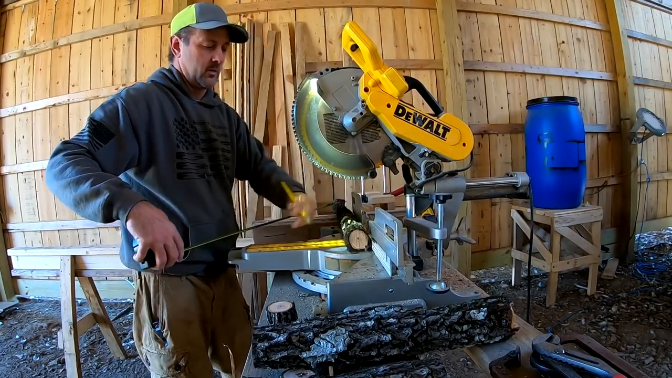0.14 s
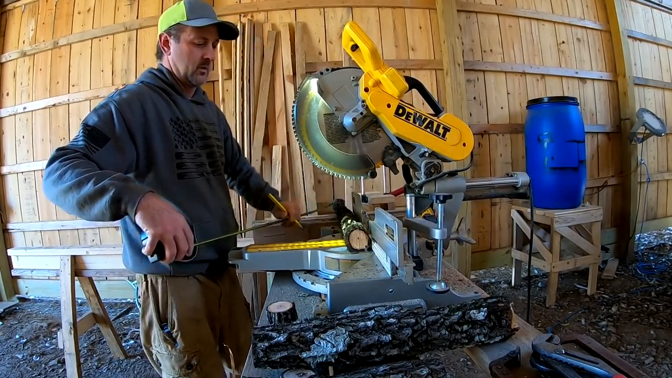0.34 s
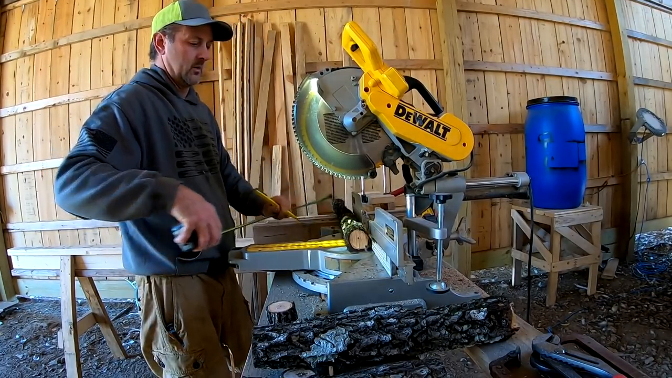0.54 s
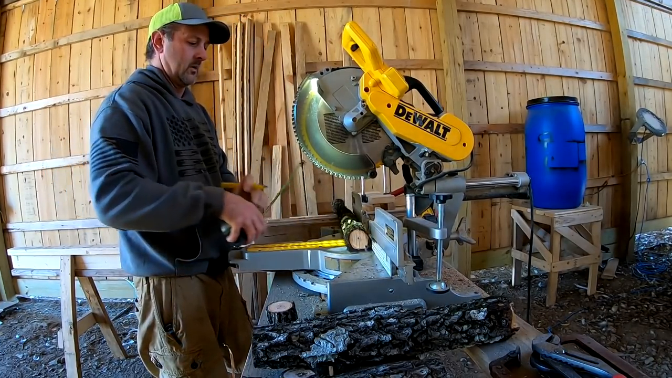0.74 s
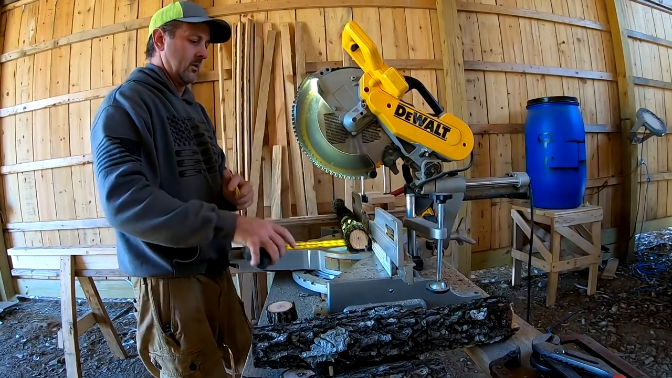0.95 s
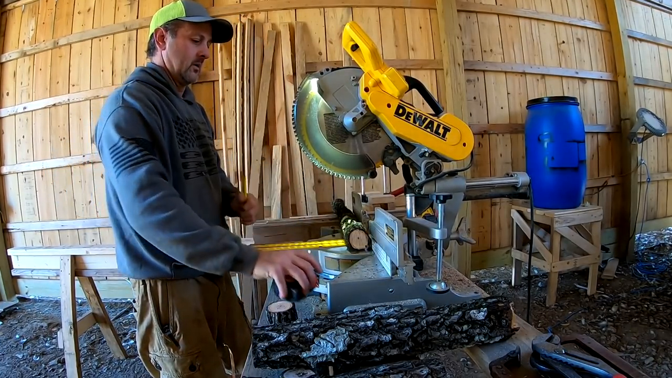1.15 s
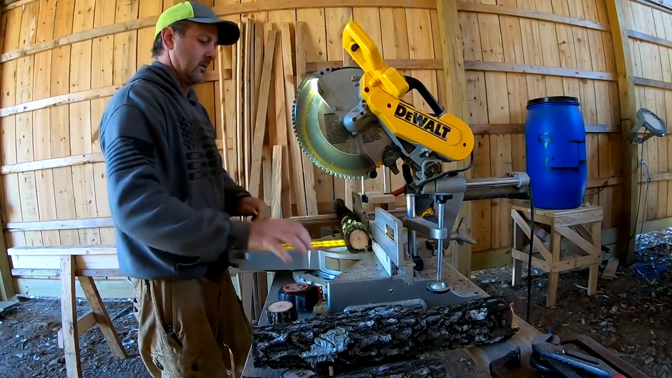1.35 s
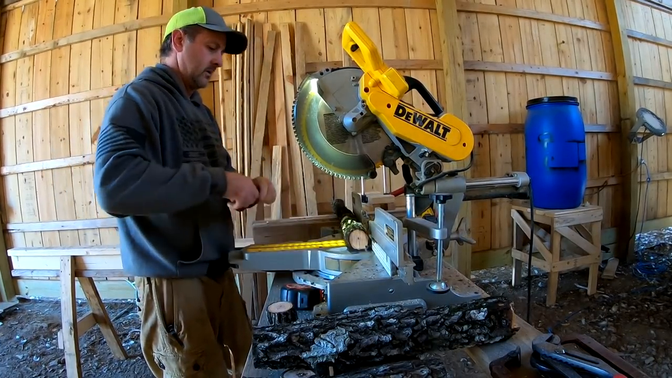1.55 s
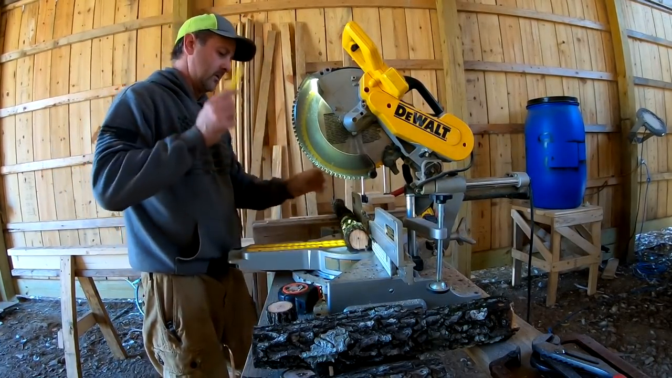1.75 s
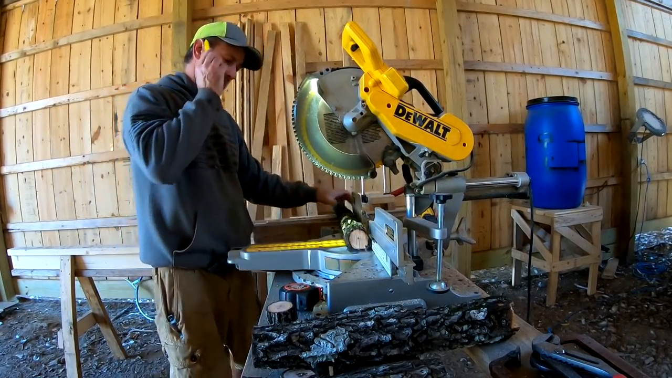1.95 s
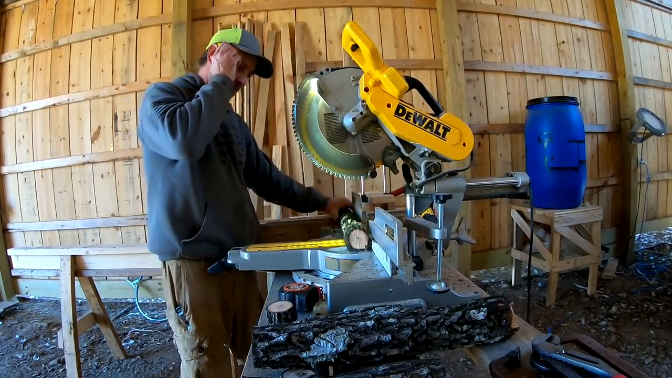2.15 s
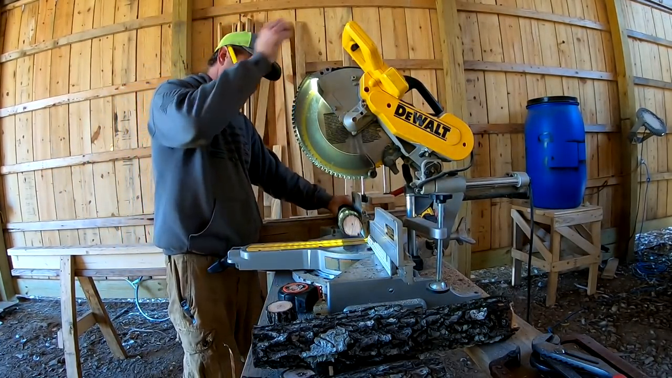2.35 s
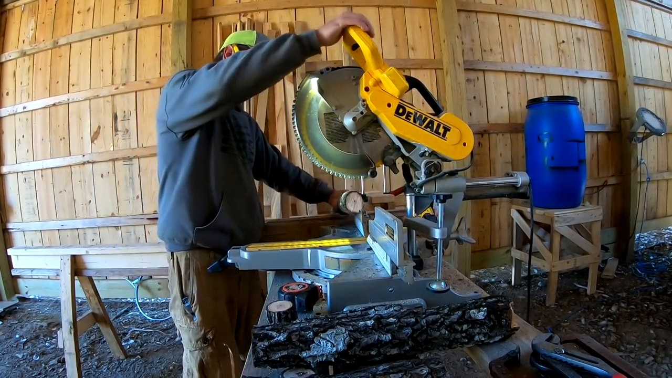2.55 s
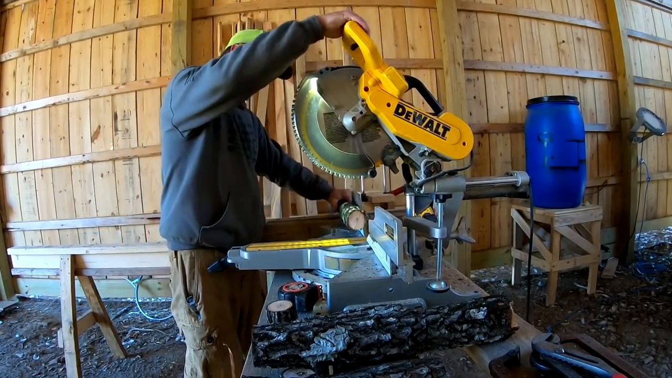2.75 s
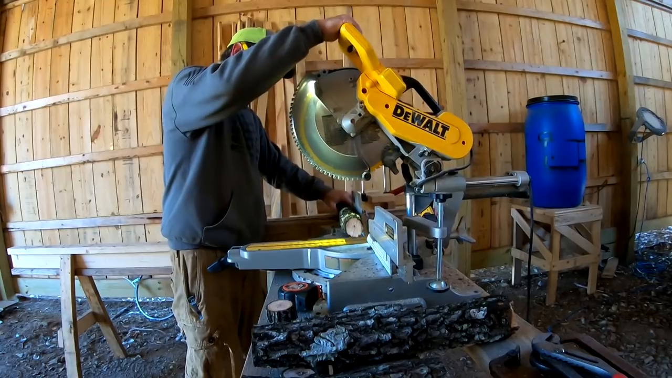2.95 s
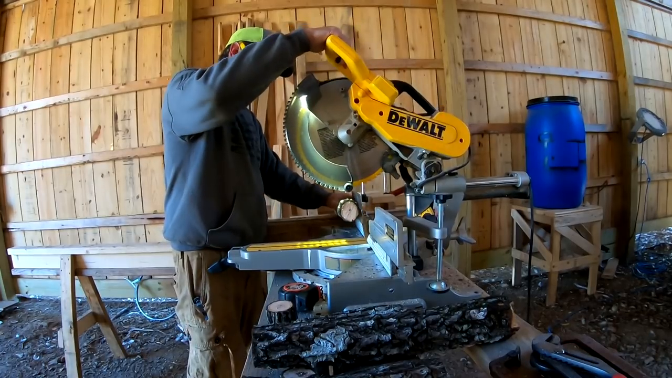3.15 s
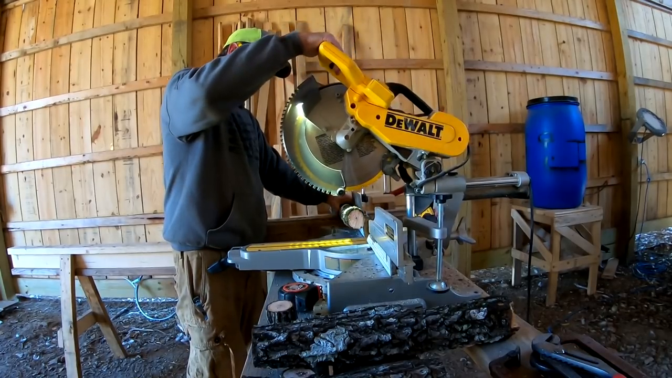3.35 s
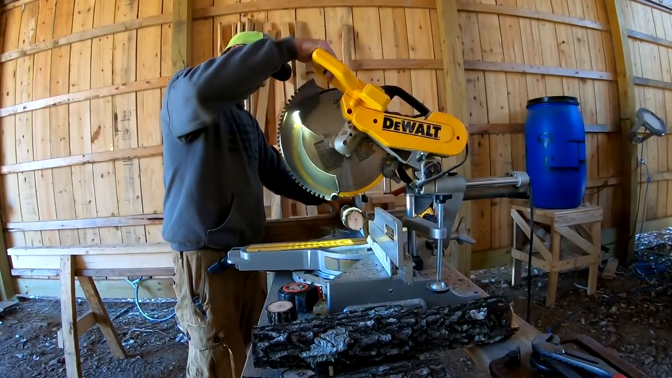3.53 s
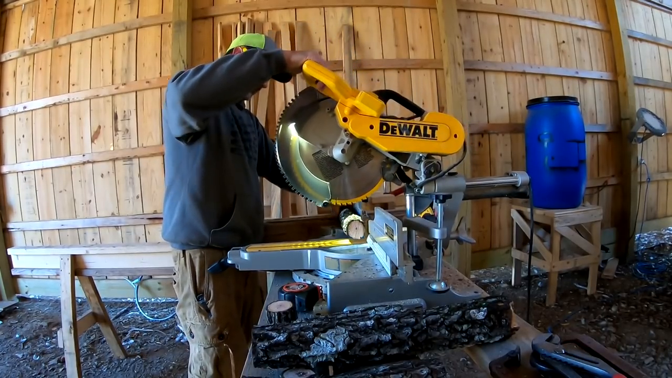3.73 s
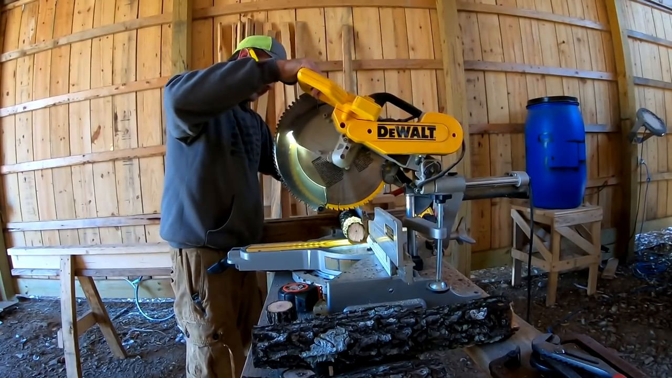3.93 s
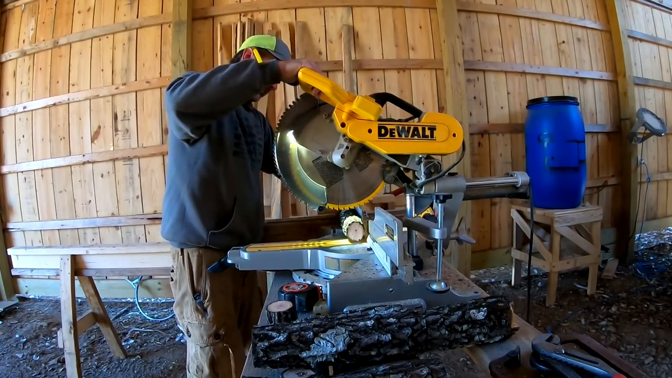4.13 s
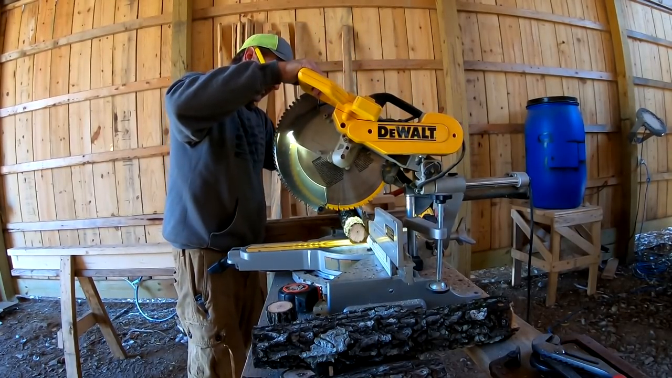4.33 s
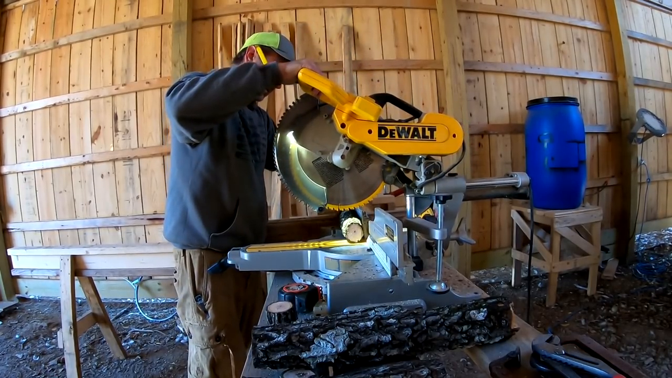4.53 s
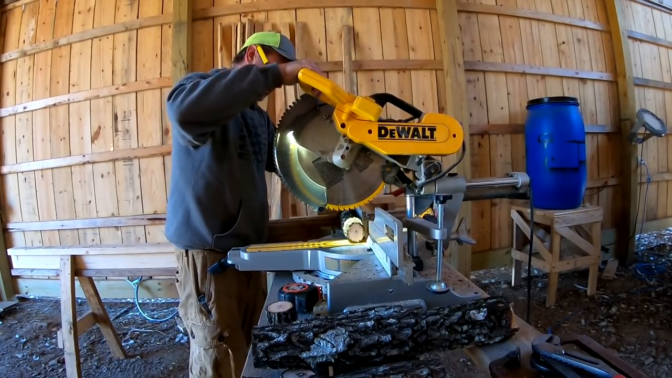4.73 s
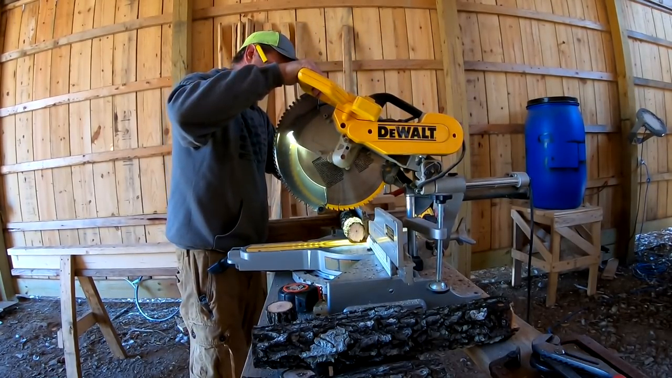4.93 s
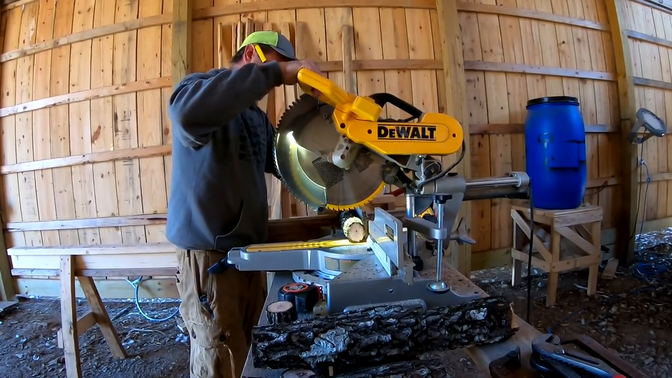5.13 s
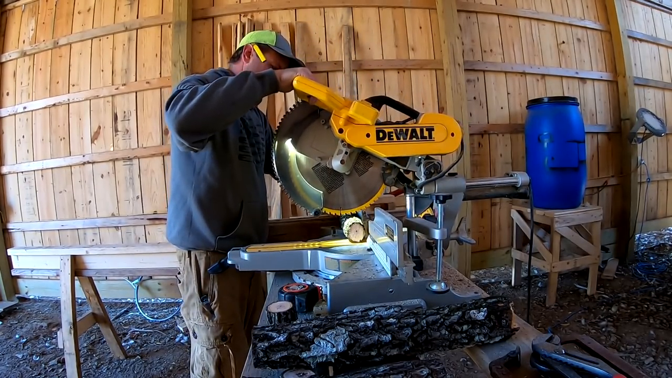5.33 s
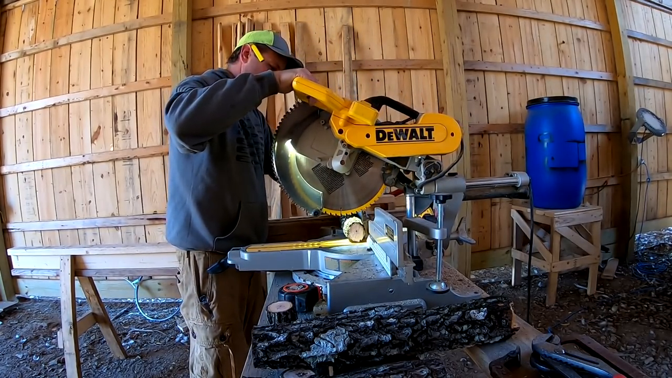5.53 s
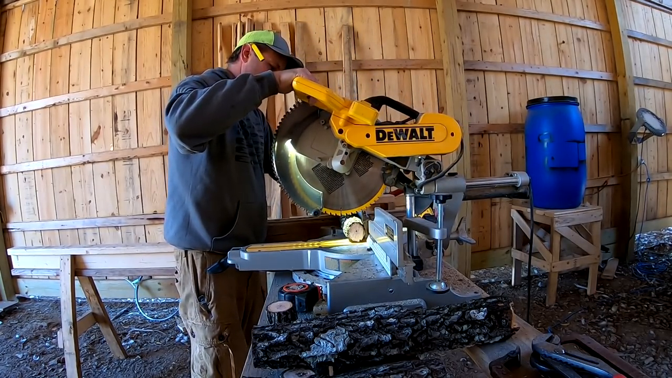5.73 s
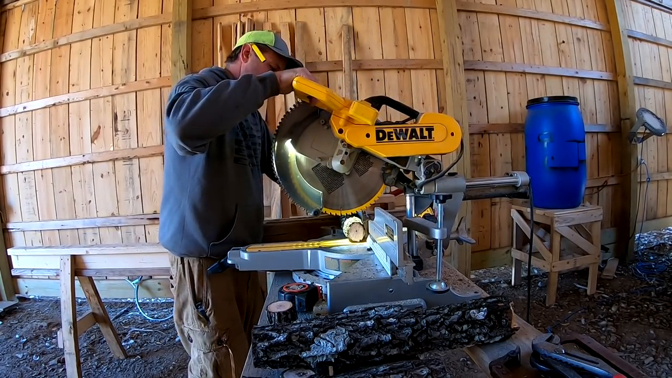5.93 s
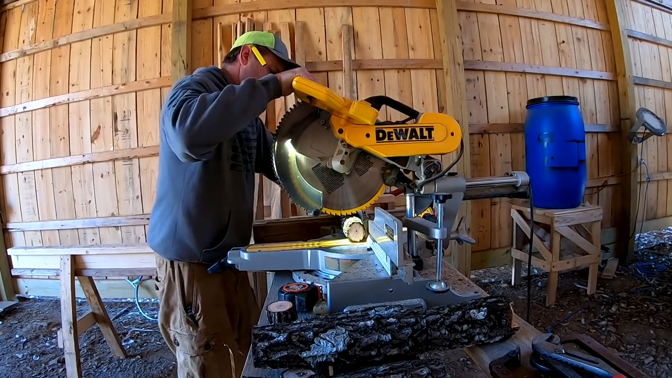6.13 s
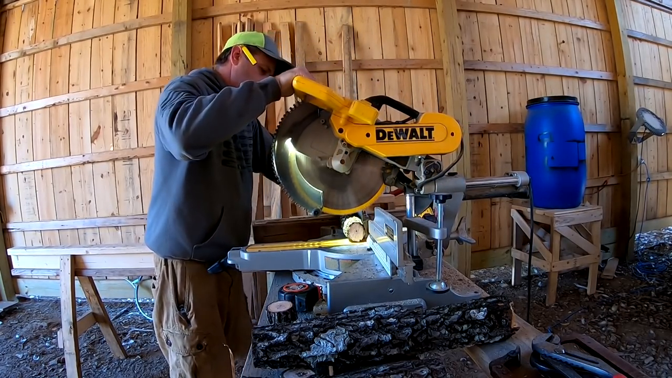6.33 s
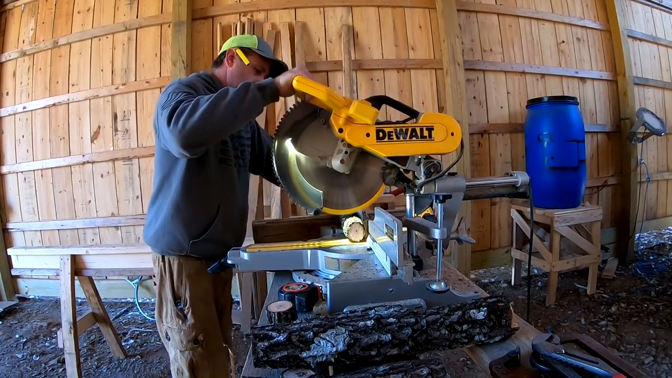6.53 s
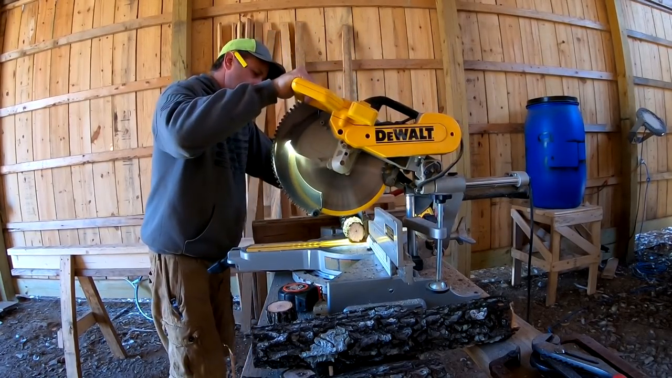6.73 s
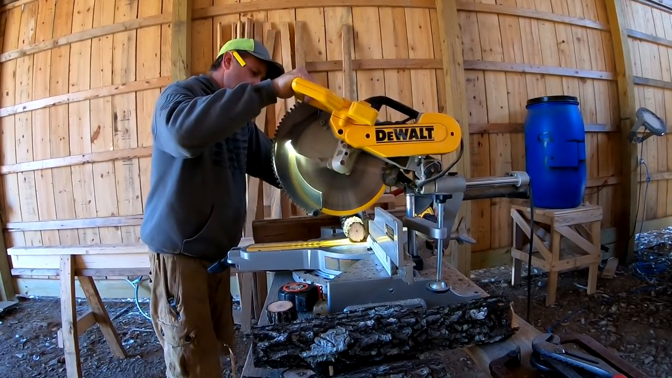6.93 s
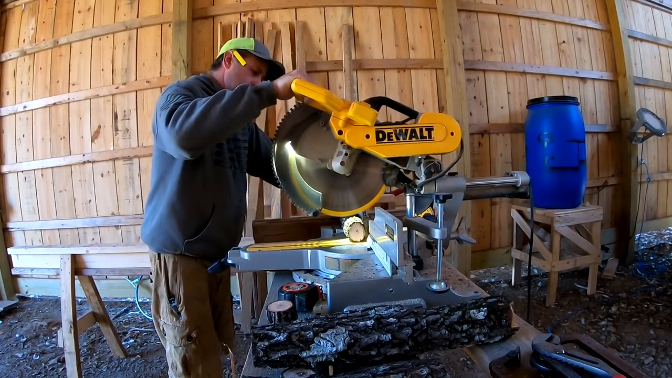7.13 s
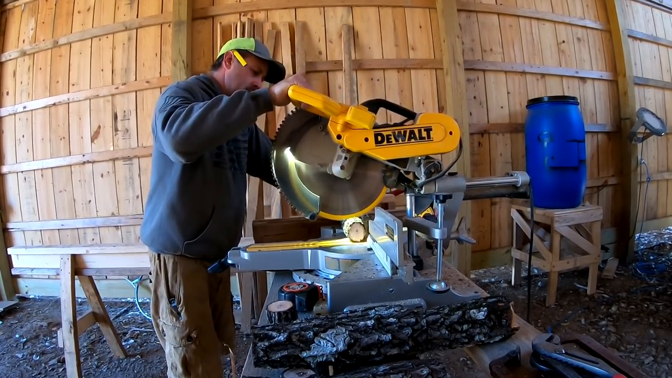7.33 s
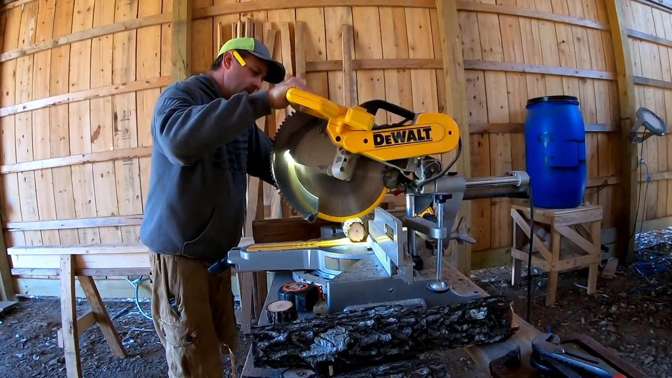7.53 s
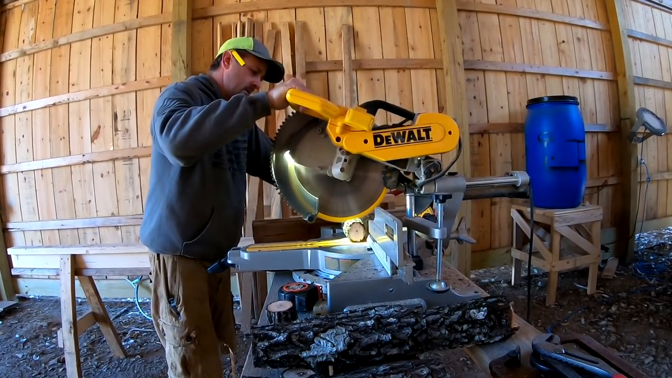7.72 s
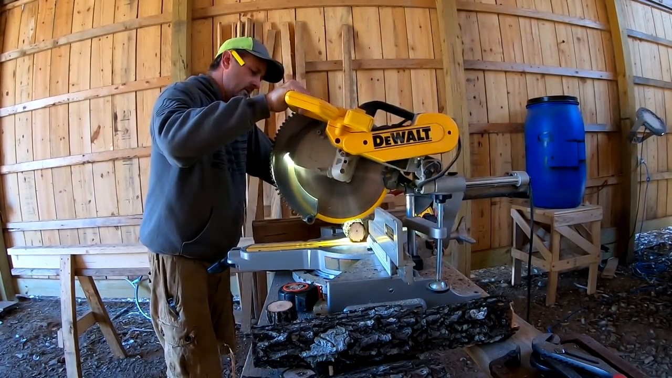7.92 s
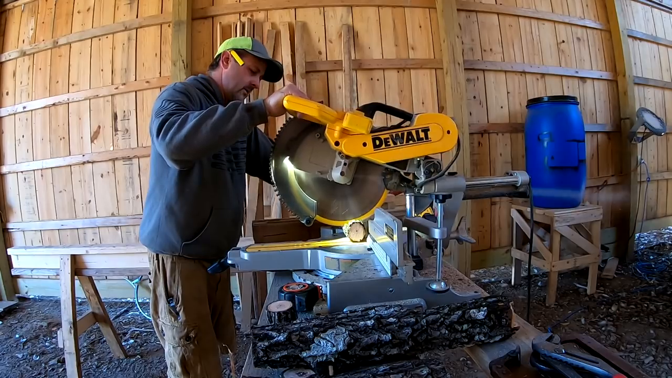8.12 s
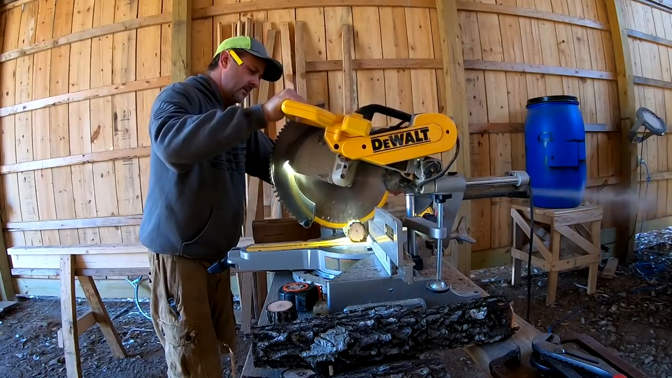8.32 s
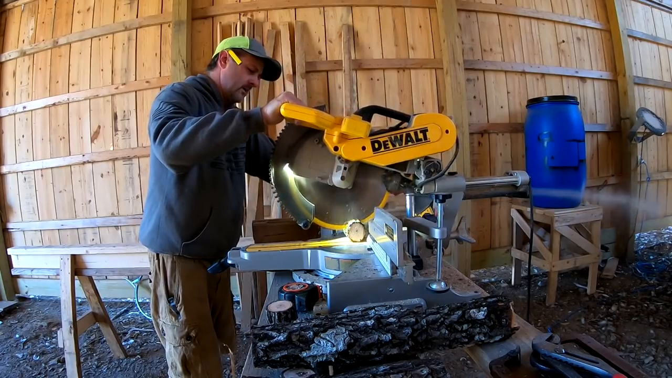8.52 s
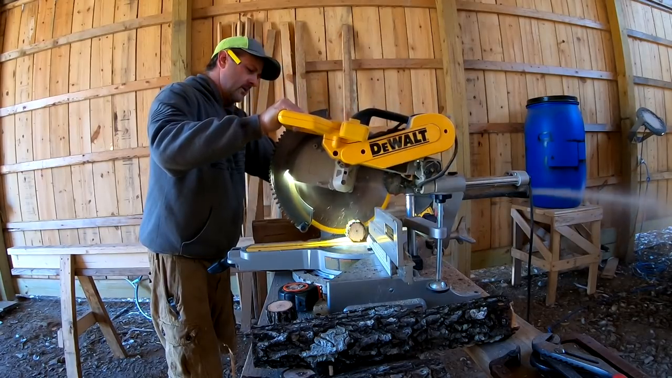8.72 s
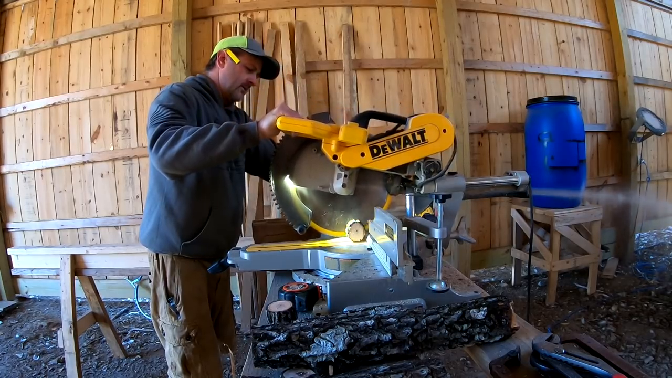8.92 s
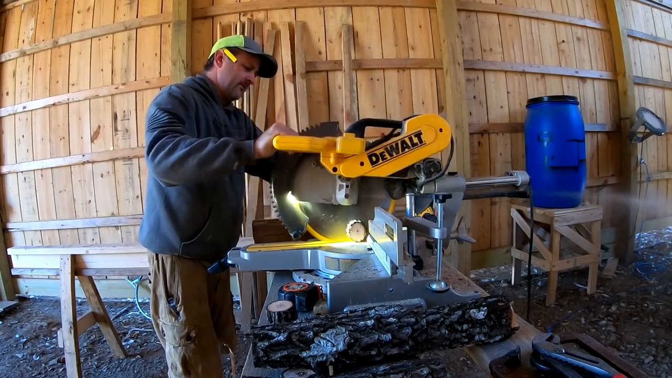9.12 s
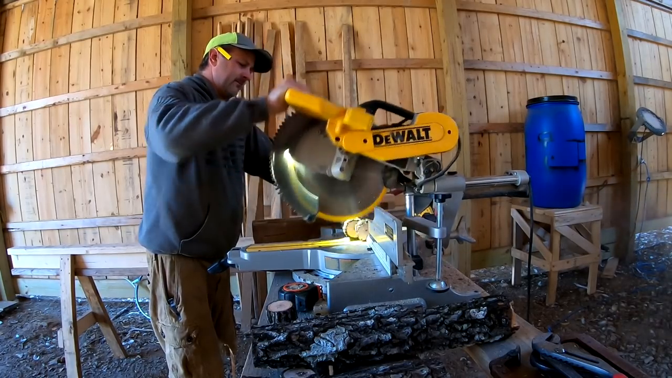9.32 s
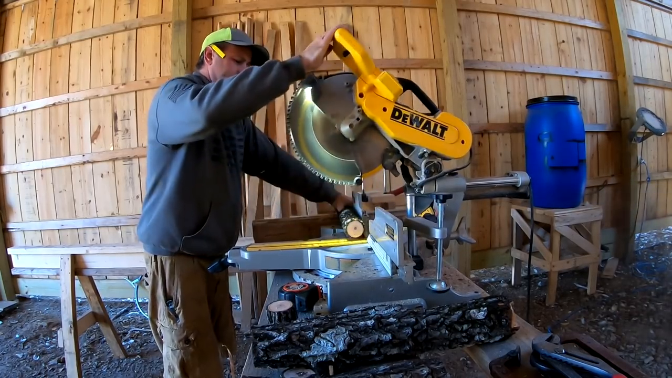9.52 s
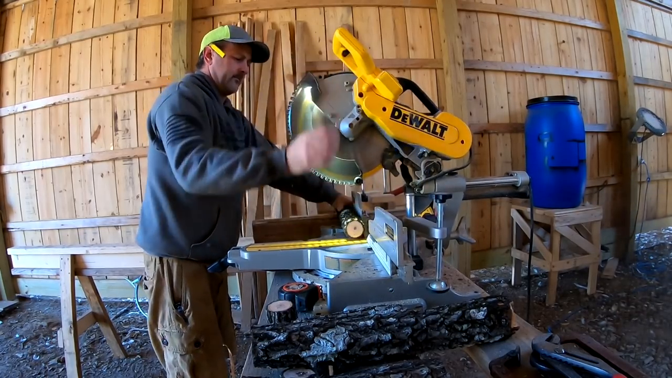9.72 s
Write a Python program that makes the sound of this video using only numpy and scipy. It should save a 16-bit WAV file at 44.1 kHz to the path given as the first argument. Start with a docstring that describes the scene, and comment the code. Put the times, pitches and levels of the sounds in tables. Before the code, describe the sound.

Metallic tape chatter and a snap, hollow wooden knocks and scrapes, then a loud power saw starts, bites through a pole and winds down.

```python
"""In a barn a steel tape measure rattles back into its case, then a wooden pole is knocked and slid into place
on a miter saw and the saw head is lowered. The motor starts with a clack and whines up to speed, the blade
bites and rings as the load drags it down, then it runs free and the brake winds it down.
Contacts and friction excite resonant bodies; the saw's whine, gears and brushes follow one speed curve,
with coloured noise for torn air and dust and tones for the modes of the disc."""
import sys
import numpy as np
from scipy import signal
from scipy.fft import rfft, irfft, next_fast_len
from scipy.io import wavfile
from scipy.ndimage import map_coordinates

SR = 44100
rng = np.random.default_rng(int(sys.argv[2]) if len(sys.argv) > 2 else 0)


def output_pcm(signal):
    """Save a mono or channel-first signal as 16-bit PCM at the path in sys.argv[1].

    Samples are clipped to [-1, 1] before scaling.
    """
    pcm = np.clip(np.atleast_2d(signal).T, -1, 1) * 32767
    wavfile.write(sys.argv[1], SR, np.round(pcm).astype(np.int16))


N = 430857

# Spectrum of the shaken bench. Each row: frequency in Hz, relative level in dB per Hz.
BENCH_RUMBLE = [(18, -41), (30, -3), (49, -2.5), (86, 1.5), (173, 3), (219, -3), (312, -4.5), (429, -20.5),
                (500, -34), (650, -43.5), (1100, -120)]
START_S, BRAKE_S = 6.368, 9.39  # trigger pulled and let go
# motor speed as the pitch of its fan whine: running free, and after the first jolt
TOP_SPEED_HZ, KICK_HZ = 2514.6, 235
RUN_UP_S, RUN_DOWN_S = .488, .465  # time constants of the speed


def amp(db):
    """Decibels to gain: 20 dB is a factor of ten in amplitude."""
    return np.exp(np.asarray(db) * float(np.log(10) / 20))


def unit(x):
    """Normalisation to a root mean square of 1."""
    return x / np.sqrt(np.mean(x ** 2) + 1e-20)


def along(points, hz):
    """Interpolation of (Hz, value) points on a logarithmic frequency axis."""
    f, v = np.transpose(points)
    return np.interp(np.log(hz + 1), np.log(f + 1), v)


def since(s):
    """Elapsed time: seconds gone by since time s, zero before it."""
    return np.maximum(np.arange(N) / SR - s, 0)


def wobble(rate):
    """Slow random modulation: a smooth curve through random knots, rate of them a second."""
    knots = rng.standard_normal(int(N * rate / SR) + 4)
    step = 16  # samples between curve points, joined by straight lines
    at = np.arange(0, N + step, step) * rate / SR
    coarse = map_coordinates(knots, [at], order=2).astype(np.float32)
    fraction = np.arange(step, dtype=np.float32) / step
    return (coarse[:-1, None] + np.diff(coarse)[:, None] * fraction).ravel()[:N]


def filtered(x, response):
    """Linear filtering: the spectrum of x times a response of frequency."""
    n = x.shape[-1]
    m = next_fast_len(n + SR // 5, True)
    hz = np.fft.rfftfreq(m, 1 / SR).astype(np.float32)
    return irfft(rfft(x.astype(np.float32), m) * response(hz), m)[..., :n]


def coloured(x, spectrum):
    """Spectral shaping: x weighted by a (Hz, dB) curve, at rms 1."""
    return unit(filtered(x, lambda hz: amp(along(spectrum, hz))))


def resonate(x, modes):
    """Modal superposition: x through a body with (Hz, width in Hz, dB) resonances of alternating sign."""
    def response(f):
        return sum((-1) ** k * amp(db) * 1j * f * width / (centre * centre - f * f + 1j * f * width)
                   for k, (centre, width, db) in enumerate(modes))
    return filtered(x, response)


def spread(pair):
    """Interaural coherence: unrelated signals become left and right, most alike in the middle range."""
    # Each row: frequency in Hz, left-right likeness from -1 to 1.
    likeness = [(30, -0.59), (60, -0.0035), (120, 0.6), (300, 1), (1000, 0.7), (2500, 0.86), (4500, 0.85),
                (8000, 0.033), (13000, 0.075)]

    def mid_side(hz):
        turn = np.arccos(np.clip(along(likeness, hz), -1, 1)) / 2
        return np.array([np.cos(turn), np.sin(turn)])
    mid, side = filtered(pair, mid_side)
    return np.array([mid + side, mid - side])


def rush(spectrum, drive=1):
    """Modulated turbulence: stereo noise of rms 1, chopped by a drive and then coloured."""
    return coloured(spread(rng.standard_normal((2, N)) * drive), spectrum)


def tone(hz):
    """Phase accumulation: a sine of rms 1 that follows a pitch curve."""
    turns = np.cumsum(hz * np.ones(N)) / SR + rng.random()
    return np.sqrt(2) * np.sin((2 * np.pi * (turns - np.floor(turns))).astype(np.float32))


def ringing(hz, width_hz):
    """Narrow-band noise: a tone under random amplitude, smeared over its width."""
    return wobble(width_hz) * tone(hz)


def burst(t60):
    """Exponential decay: the noise of one contact, falling 60 dB in t60 seconds."""
    t = np.arange(SR // 4) / SR
    return rng.standard_normal(len(t)) * amp(-60 * t / t60)


def blow(x):
    """Normalisation of a hit to rms 1 over its first 20 ms."""
    return x / np.sqrt(np.mean(x[:SR // 50] ** 2))


def add(track, s, x):
    """Superposition: mix x into the track at time s."""
    part = track[max(round(s * SR), 0):][:len(x)]
    part += x[:len(part)]


def strokes(rows, attack_s, release_db_per_s):
    """Energy sum of (s, length s, dB) strokes: each rises up to its time, holds and dies away."""
    t, power = np.arange(0, N, 32) / SR, 0
    for s, length, db in rows:
        rise = np.clip(1 + (t - s) / attack_s, 0, 1)
        fall_db = release_db_per_s * np.maximum(t - s - length, 0)
        power = power + (rise * amp(db - fall_db)) ** 2
    return np.interp(np.arange(N) / SR, t, np.sqrt(power))


def barn(x, wet_db):
    """Diffuse reverberation: direct sound plus the dense, decaying answer of the plank walls."""
    # Each row: frequency in Hz, reverberation time (60 dB) in seconds.
    decay = [(100, 0.25), (500, 0.69), (2500, 0.48), (6000, 0.41), (13000, 0.41)]
    hz, t, z = signal.stft(rng.standard_normal((2, SR * 3 // 4)), SR, nperseg=256)
    envelope = amp(-60 * t / along(decay, hz)[:, None]) * (1 - np.exp(-t / 0.00078))
    tail = spread(signal.istft(z * envelope, SR, nperseg=256)[1])
    wet = signal.fftconvolve(x[None], tail / np.linalg.norm(tail[0]), axes=1)[:, :N]
    return (x + amp(wet_db) * wet) / np.hypot(1, amp(wet_db))


def quiet():
    """Ambient noise: the faint, steady air of the barn."""
    # Each row: frequency in Hz, relative level in dB per Hz.
    quiet_colour = [(15, -38.5), (25, -2.5), (98, -12), (181, 7), (271, -2.5), (335, -13.5), (749, -8),
                    (1030, -13), (1960, -17), (4040, -19.5), (15000, -42)]
    return amp(-72.0) * rush(quiet_colour)


def sleeve():
    """Fibre friction: fleece swishes as an arm reaches up to the handle."""
    # Each row: start in seconds, length in seconds, level in dB.
    reaches = [(1.84, .03, -84), (2.13, .45, -80.5), (2.6, 0.47, -75)]
    # Each row: frequency in Hz, relative level in dB per Hz.
    cloth = [(2500, -22), (4500, -2), (7000, 3.5), (10500, -1.5), (12000, -12), (14000, -11.5),
             (15200, -26)]
    return strokes(reaches, attack_s=0.12, release_db_per_s=71.0) * rush(cloth)


def tape():
    """Friction and impact: the steel strip chatters through the mouth of its case, rings it and slaps it."""
    # The strip runs in by spurts, each at its own pitch. Each row: start in seconds, length in seconds,
    # relative hiss level in dB, relative ring level in dB, ring pitch in Hz.
    runs = [(0.185, 0.047, -58.5, -63.5, 3130), (0.375, .01, -59.5, -67.5, 3200),
            (0.388, 0.081, -49, -55, 3140), (0.518, 0.023, -52.5, -59, 3400),
            (0.539, 0.046, -39, -33, 3125), (0.595, 0.33, -44, -55, 3330), (0.837, 0.02, -46, -31, 3120),
            (0.872, .016, -40, -36.5, 3050), (0.895, .02, -34.5, -30, 3440),
            (0.911, .016, -35, -30.5, 2950), (0.947, .016, -40, -42, 3400), (0.963, .016, -32, -40.5, 2700),
            (1.01, 0.012, -41.5, -42, 3220), (1.034, .018, -46.5, -44, 3600),
            (1.08, .018, -53.5, -42, 2920)]
    # Each row: frequency in Hz, relative level in dB per Hz.
    tape_colour = [(120, -49.5), (200, -19.5), (231, -13.5), (462, -9.5), (653, -8.5), (992, -11.5),
                   (1090, -6.5), (1400, -13.5), (1810, -3.5), (3480, 2), (4410, -4), (7350, -6.5),
                   (10200, -15.5), (13600, -30), (15500, -50)]
    # Case and strip. Each row: multiple of the ring pitch, width in Hz, relative level in dB.
    case = [(.63, 120, -8), (.8, 110, -8), (1, 170, 6), (1.14, 200, 0), (1.47, 130, -6.5),
            (2.25, 260, -12.5), (2.6, 400, -15.5)]
    # Slaps, and the hook hits the case. Each row: time in seconds, peak before reverberation in dB.
    clicks = [(.067, -49.5), (0.386, -48), (0.543, -35), (0.578, -33), (.827, -37), (.841, -31),
              (.871, -22), (.894, -21.5), (0.923, -22.5), (1.015, -10.5), (1.03, -29), (1.087, -30),
              (1.101, -29.5), (1.133, -39)]
    # The slack strip hums faintly. Each row: start in seconds, length in seconds, pitch in Hz, level in dB.
    slack = [(0.099, .1, 850, -76), (0.187, 0.13, 3150, -74)]
    hiss = strokes([row[:3] for row in runs], attack_s=0.0046, release_db_per_s=259.5)
    scraping = rng.standard_normal(N) * amp(3.3 * wobble(900) + 1.1 * wobble(60))
    chatter = amp(-2.0) * hiss * coloured(scraping, tape_colour)
    t = np.arange(SR // 2) / SR
    for s, length, _, ring_db, ring_hz in runs:
        modes = [(k * ring_hz, width, db) for k, width, db in case]
        ring = resonate(scraping[round(s * SR):][:len(t)], modes)
        decay_db = 420 * np.maximum(t - length, 0)
        add(chatter, s - .002, amp(ring_db - 7.5 - decay_db) * unit(ring))
    for s, db in clicks:
        snap = coloured(burst(t60=0.01), tape_colour)
        add(chatter, s, amp(db) * snap / np.abs(snap).max())
    twangs = sum(strokes([(s, length, db)], attack_s=.01, release_db_per_s=119.5) * ringing(hz, width_hz=74)
                 for s, length, hz, db in slack)
    return barn(chatter, wet_db=-3) + twangs


def scuffs():
    """Granular friction: rough bark grates in short strokes along the fence."""
    # Each row: start in seconds, length in seconds, level in dB.
    grates = [(2.31, .02, -65), (2.392, 0.027, -65), (2.647, 0.014, -57.5), (2.668, 0.014, -54.5),
              (4.23, .06, -62), (4.538, .03, -56.5), (4.63, 0.045, -49), (5.192, 0.013, -57.5),
              (5.277, .02, -59.5)]
    # Each row: frequency in Hz, relative level in dB per Hz.
    scuff_colour = [(400, -19), (800, 5), (1250, 4), (1750, 2.5), (2300, -12), (3000, -16), (5000, -37),
                    (9000, -61.5)]
    grating = rng.standard_normal(N) * amp(2 * wobble(300))
    level = strokes(grates, attack_s=.002, release_db_per_s=300)
    return barn(level * coloured(grating, scuff_colour), wet_db=-4)


def sliding():
    """Stick-slip friction: bark catches on the table, shaking the bench; sleeves rustle, the pivot squeaks."""
    # Pole and saw head are shoved along. Each row: start in seconds, length in seconds,
    # relative levels of rumble, scrape and rustle in dB.
    shoves = [(.01, 0.017, -64.5, -66.5, -74), (1.503, .12, -61.5, -82.5, -83),
              (1.81, .03, -63, -88, -91.5), (2.183, 0.098, -58.5, -66, -72),
              (2.317, 0.058, -46, -50, -72.5), (2.45, 0.53, -51, -60, -73.5),
              (2.656, 0.018, -45, -47.5, -59), (2.914, 0.18, -40, -42, -58),
              (3.207, .7, -58.5, -50.5, -66.5), (3.966, 0.022, -57, -57, -54),
              (4.223, 0.29, -57.5, -55, -67.5), (4.64, 0.048, -50.5, -46.5, -72),
              (5.002, 0.093, -38, -63.5, -55.5), (5.195, 0.27, -57, -53.5, -61),
              (5.834, 0.067, -71, -53, -68), (6.143, 0.033, -73.5, -72.5, -67),
              (6.343, .04, -60, -47, -54.5)]
    # Each row of these two: frequency in Hz, relative level in dB per Hz.
    scrape_colour = [(300, -29), (420, -4.5), (520, 0), (570, -5.5), (625, -1.5), (690, -1.5), (800, -10.5),
                     (950, -15), (1150, -13.5), (1400, -11), (2000, -17.5), (2600, -28.5), (4000, -69.5)]
    rustle_colour = [(900, -10), (1800, -2.5), (2500, 0), (4600, -6.5), (5600, -22.5), (8000, -19),
                     (10500, -29), (12000, -41), (15000, -40.5)]
    # Pivot, guard spring and creaking pole. Each row: start in seconds, length in seconds,
    # pitch in Hz, level in dB.
    creaks = [(5.185, .035, 2200, -55.5), (5.268, .04, 1500, -58), (3.02, 0.0834, 10400, -58),
              (5.72, .07, 2500, -72.5), (5.76, 0.054, 3800, -74), (3.3, 0.14, 8100, -84.5),
              (3.932, 0.071, 8200, -86.5)]
    rumble, scrape, rustle = (
        strokes([(s, length, levels[k]) for s, length, *levels in shoves], attack_s=0.044, release_db_per_s=104)
        for k in range(3))
    slips = amp(1.3 * wobble(45) + 2 * wobble(300))
    squeaks = np.zeros(N)
    for s, length, hz, db in creaks:
        size = round(length * SR)
        mode = [(hz, 600, 0)]
        squeak = resonate(resonate(rng.standard_normal(size), mode), mode)
        add(squeaks, s, amp(db) * np.hanning(size) * unit(squeak))
    return (amp(-1.0) * rumble * rush(BENCH_RUMBLE, slips) + amp(-4.5) * scrape * rush(scrape_colour, slips)
            + amp(-4) * rustle * rush(rustle_colour, slips) + squeaks)


def judder():
    """Stick-slip excitation: the dragged pole rings the main mode of the table, which sings on afterwards."""
    # Each row: start in seconds, length in seconds, relative level in dB.
    drags = [(4.489, 0.086, -44.5), (4.634, 0.027, -35.5), (4.709, 0.019, -44), (5.329, .15, -58)]
    level = strokes(drags, attack_s=0.013, release_db_per_s=190.0)
    after = [(s + length, 0, db - 10) for s, length, db in drags]
    linger = strokes(after, attack_s=.03, release_db_per_s=63)
    main = amp(3 * wobble(45)) * tone(628 * (1 + .022 * wobble(70)))
    side_modes = amp(-10.5) * ringing(560, width_hz=90) + amp(-14) * ringing(1150, width_hz=190)
    return (level + linger) * (amp(-5) * main + side_modes)


def crack(corner_hz):
    """Contact stiffness: the noise of one contact and its scatter nearby, duller for a softer one."""
    # Each row: frequency in Hz, relative level in dB per Hz.
    crack_colour = [(250, -2), (500, 4), (1300, 2), (1900, -0.5), (3200, 3.5), (4800, -1.5), (7000, -4.5),
                    (10000, -5.5), (15000, -20.5)]

    def response(hz):
        ratio = hz / corner_hz
        return amp(along(crack_colour, hz)) / (1 + 1.4j * ratio - ratio ** 2) / (1 + .4j * ratio)
    noise = filtered(burst(t60=0.03) + amp(-15.0) * burst(t60=0.21), response)
    rise = np.minimum(np.arange(len(noise)) / SR / 0.00098, 1)
    return blow(noise * rise)


def knocks():
    """Impact excitation: bumps thud in the bench and shake it, hard contacts crack; both ring the saw table."""
    # Wood and saw bump the bench. Each row: time in seconds, relative level in dB, thud pitch in Hz.
    bumps = [(1.283, -18, 141.2), (1.294, -19.5, 133), (1.744, -49.5, 195.5), (1.874, -48.5, 172),
             (2.073, -50, 193), (2.27, -39.5, 440), (2.309, -38, 470), (2.327, -37.5, 364),
             (2.366, -30.5, 210), (2.391, -39.5, 390), (2.478, -40.5, 440), (2.579, -36.5, 118),
             (2.885, -23, 239.4), (2.977, -13, 257.7), (2.987, -14.5, 292), (3.03, -17.5, 130.6),
             (3.057, -25, 118), (3.357, -25, 163), (3.693, -31, 215), (4.204, -25, 214.2),
             (4.227, -19, 225), (4.299, -20, 294.5), (4.339, -27, 268), (4.44, -24.5, 256),
             (4.535, -26, 320), (4.631, -34, 287), (4.98, -33.5, 169.8), (5.02, -34, 165)]
    # Hard contacts of case, fence, guard and starting gear. Each row: time in seconds,
    # relative level in dB, corner frequency in Hz.
    contacts = [(.969, -32, 2500), (1.015, -26.5, 5000), (1.284, -20, 6560), (1.475, -51.5, 4000),
                (1.521, -55.5, 4500), (1.567, -57, 7000), (1.593, -58.5, 5000), (2.272, -47, 694),
                (2.392, -40, 1000), (2.482, -43.5, 798), (2.579, -46, 9000), (2.647, -49, 1480),
                (2.885, -28.5, 5980), (2.892, -30, 7580), (2.977, -38.5, 797), (3.357, -37.5, 1500),
                (3.713, -52.5, 6000), (3.766, -52.5, 6000), (3.825, -54.5, 6000), (3.957, -42, 6000),
                (4.205, -41.5, 800), (4.244, -32.5, 702), (4.536, -37.5, 900), (4.632, -40, 996),
                (5.192, -43.5, 1400), (5.312, -59, 4000), (5.842, -38, 1200), (6.313, -52, 2470),
                (6.369, -16.5, 4600), (6.392, -29.5, 3970)]
    # Bench and metal saw table. Each row: mode in Hz, width in Hz, relative level in dB.
    bench = [(88.5, 5.1, -1.5), (121.5, 20, -2.5), (155.2, 23, -6.5), (188, 36, -6), (268, 26, 5),
             (302, 71, 1), (372, 60, 0.5), (463, 87, -6)]
    table = [(533.4, 110, 4.5), (628, 32, 10), (683, 17, 7), (834, 110, -21), (1110, 60, -11),
             (1353, 53, -7.5), (1876, 72, -25.5)]
    thuds, clacks = np.zeros(N), np.zeros(N)
    t = np.arange(SR // 4) / SR
    contact = t * np.exp(-t * 9000)  # soft wood on metal
    ring = blow(resonate(contact, table))
    for s, db, thud_hz in bumps:
        # a soft, heavy contact drives the low modes, a brisk one the high modes
        push = np.sin(2 * np.pi * thud_hz * t) * np.exp(-1.1 * thud_hz * t)
        add(thuds, s, amp(db) * blow(resonate(push, bench)))
        # the ring grows more slowly than the thud; the faintest bumps hardly reach the table
        ring_db = min(-30 + 0.39 * db, db + 2 * (db + 34.5))
        bark = amp(db - 17) * crack(corner_hz=750)
        add(clacks, s, amp(ring_db) * ring + bark)
    for s, db, corner_hz in contacts:
        add(clacks, s, amp(db) * (crack(corner_hz) + amp(-26) * ring))
    # the bench shakes on after a bump
    shake = strokes([(s + .02, 0, db - 19) for s, db, _ in bumps], attack_s=0.037, release_db_per_s=118.5)
    hits = barn(thuds, wet_db=-4.0) + barn(clacks, wet_db=-3.0)
    return amp(-9.5) * hits + amp(-2.5) * shake * rush(BENCH_RUMBLE)


def sag():
    """Load on a motor: the speed it loses to the cut, in Hz of the whine."""
    # Each row: time in seconds, speed lost in Hz of the whine.
    lost = [(7.8, 0.5), (8.02, 57), (8.2, 66), (8.65, 278.5), (8.8, 387.5), (9.03, 446), (9.2, 352.5),
            (9.389, 156)]
    return np.interp(since(0), *np.transpose(lost))


def speed():
    """First-order dynamics: an exponential approach to free speed, a sag under load, exponential braking."""
    free = TOP_SPEED_HZ - (TOP_SPEED_HZ - KICK_HZ) * np.exp(-since(START_S) / RUN_UP_S)
    return (free - sag()) * np.exp(-since(BRAKE_S) / RUN_DOWN_S)


def depth():
    """Gradual engagement: how fully the blade is in the wood, 0-1."""
    cut_in_s, enter_s = 7.85, 0.029  # when the blade enters, and how gradually
    cut_out_s, leave_s = 9.12, 0.0051
    t = since(0)
    entered = (1 + np.tanh((t - cut_in_s) / (2 * enter_s))) / 2
    return entered * (1 - np.tanh((t - cut_out_s) / (2 * leave_s))) / 2


def bite(cutting):
    """Cutting force: how hard the teeth work, 0-1, growing with the load as the blade sinks in."""
    light = 0.41  # on first touching the pole, as a share of the deepest cut
    load = sag()
    return cutting * (light + (1 - light) * load / load.max())


def running(cutting, db, attack_s, cut_db, brake_db_per_s):
    """Exponential build-up: a saw noise grows from the start, changes in the wood, fades under the brake."""
    build = 1 - np.exp(-since(START_S) / attack_s)
    return build * amp(db + cut_db * cutting - brake_db_per_s * since(BRAKE_S))


def drivetrain(whine_hz, cutting):
    """Rotating unbalance: shafts and gears hum unevenly in the housing, sagging in pitch under load."""
    # Each row: multiple of the whine, relative level in dB.
    gears = [(.087, -20.5), (.113, -16.5), (0.14, -21.5), (.22, -16), (.305, -9.5), (.55, -10.5), (.68, -8)]
    hum = running(cutting, db=-39.0, attack_s=.03, cut_db=1.0, brake_db_per_s=1.5)
    spin = np.minimum(whine_hz / 2400, 1) ** 2  # unbalance grows with the square of the speed
    return spin * hum * sum(amp(db) * ringing(k * whine_hz, width_hz=7) for k, db in gears)


def windage(whine_hz, cutting):
    """Turbulence: air torn by fan and teeth pulses with each blade turn, sings in the guard; dust hisses."""
    # Each row of these three: frequency in Hz, relative level in dB per Hz.
    housing_colour = [(18, -60), (30, -35), (108, -4.5), (141, -9), (178, -3), (222, -11.5), (264, -3.5),
                      (295, -8), (368, -4.5), (474, -3.5), (538, 2), (591, -1), (660, 5), (797, -11.5),
                      (1300, -1.5), (1690, 1.5), (2860, -120)]
    air_colour = [(600, -25), (950, -4.5), (1300, -12.5), (1550, -12.5), (1800, -4), (2200, 2), (2550, 7),
                  (2800, -2.5), (3080, 3), (3500, 5.5), (4100, -2.5), (5000, -10.5), (7000, -46),
                  (12000, -76)]
    spray_colour = [(2500, -14), (4500, 0), (5400, -3), (6300, -0.5), (7100, -0.5), (8000, -3),
                    (10500, -8.5), (11800, -17), (13800, -20.5), (15500, -44)]
    # Blade guard and motor case. Each row: mode in Hz, width in Hz, relative level in dB.
    guard_modes = [(1455, 56, -3.5), (1554, 120, -5), (1925, 63, 0), (2680, 86, 4), (3051, 45, 8.5),
                   (3300, 200, -13), (3970, 130, -7.5), (5324, 100, -3.5), (7140, 220, -7.5),
                   (8800, 180, -20.5)]
    strain_db = 5 * np.exp(-since(START_S) / RUN_UP_S)  # louder while the motor pulls up to speed
    housing = amp(strain_db) * running(cutting, db=-37.5, attack_s=0.063, cut_db=-3.5, brake_db_per_s=4.0)
    air = running(cutting, db=-25.0, attack_s=0.16, cut_db=-4.5, brake_db_per_s=23.5)
    air = air * (1 - sag() / TOP_SPEED_HZ) ** 0.63
    spray = running(bite(cutting), db=-38.5, attack_s=0.34, cut_db=8.5, brake_db_per_s=17)
    turn = tone(whine_hz / 43.7)  # one cycle a turn of the blade
    drive = amp(.8 * turn + 2 * wobble(450))
    guard = unit(resonate(spread(rng.standard_normal((2, N)) * drive), guard_modes))
    torn_air = amp(-5.0) * rush(air_colour, drive) + amp(-7.5) * guard
    return housing * rush(housing_colour) + air * torn_air + spray * rush(spray_colour, drive)


def motor(whine_hz, cutting):
    """Harmonic radiation: the fan sings at speed multiples; heavy current sizzles brushes, groans the frame."""
    # The housing favours some fan pitches. Each row: frequency in Hz, relative level in dB.
    favoured = [(400, -65.5), (1000, -44), (1300, -38), (1480, -28.5), (1650, -37), (1950, -35.5),
                (2150, -36), (2290, -40.5), (2370, -31.5), (2430, -32), (3000, -34), (3600, -34),
                (4050, -28.5), (4400, -36.5), (4800, -33), (5100, -38), (5350, -26.5), (5700, -33.5)]
    # Fan tones and their smeared ridges. Each row of both: multiple of the whine, relative level in dB.
    orders = [(1, 4.5), (1.05, -6.5), (1.999, -6.5), (2.67, -17)]
    ridges = [(1, -7.5), (1.399, -4), (2.03, -12), (2.68, -19)]
    # Commutator. Each row: multiple of the whine, relative levels speeding up and braking in dB.
    commutator = [(2.0, 9, 0.5), (3, 1.5, -2.5), (3.902, 1.5, -9), (4.92, 3, 1.5), (5.398, -5, -14.5),
                  (6.351, -6.5, -17), (6.72, -6, -8), (10, 2, -23)]
    # Brushes spark while speeding up and braking. Each row: start in seconds, length in seconds,
    # relative level in dB.
    sparks = [(6.49, .24, -43), (9.402, 0.27, -40)]
    # Frame. Each row: frequency in Hz, random waver in Hz, relative level in dB.
    frame = [(251, 20, -14.5), (486, 9.3, 0.5), (545, 20, -0.5), (629, 50, -2)]
    # Mains hum of the straining motor, at the jolt and at full torque. Each row: start in seconds,
    # length in seconds, relative level in dB.
    strain = [(6.4, 0.016, -41), (6.6, 0.032, -37.5)]
    whine = running(cutting, db=0.5, attack_s=.02, cut_db=-7.5, brake_db_per_s=11.5)
    inrush = strokes([(START_S + 0.02, 0.08, -33.5)], attack_s=0.011, release_db_per_s=94)
    pulling, braking = (strokes([row], attack_s=0.083, release_db_per_s=44.0) for row in sparks)
    # the whine clears as it nears full speed
    jitter = 1 + np.interp(whine_hz, [1400, 2350], [.024, .005]) * wobble(220)
    lines = sum(amp(db + along(favoured, k * whine_hz) + 3.1 * wobble(45)) * tone(k * whine_hz * jitter)
                for k, db in orders)
    # turbulence smears each fan tone into a broad ridge
    flutter = sum(amp(db + along(favoured, k * whine_hz)) * ringing(k * whine_hz, width_hz=260)
                  for k, db in ridges)
    sizzle = sum((amp(up_db) * pulling + amp(down_db) * braking) * ringing(k * whine_hz, width_hz=310)
                 for k, up_db, down_db in commutator)
    sizzle = filtered(sizzle, lambda hz: 1 / (1 + (hz / 10000) ** 10))
    groan = sum(amp(db) * tone(hz + waver_hz * wobble(70)) for hz, waver_hz, db in frame)
    hum = strokes(strain, attack_s=0.054, release_db_per_s=51.0) * amp(2.4 * wobble(27))
    hum = hum * tone(121 * (1 + 0.086 * wobble(25)))
    hum = hum * np.minimum(since(START_S) / .02, 1)  # silent before the start
    fan = whine * (amp(-4.0) * lines + amp(-1.5) * flutter)
    return hum + barn(fan + amp(-4.0) * sizzle, wet_db=-0.5) + inrush * groan


def cut(whine_hz, cutting):
    """Plate vibration: air and wood ring a disc stiffened by speed; a wavering tone roughly follows the motor."""
    # Ringing of the steel disc. Each row: frequency in Hz at the reference speed,
    # relative levels spinning free and deep in the wood in dB.
    blade = [(1550, -60.5, -45), (2510, -42, -63.5), (2575, -37, -59), (2744, -42, -58.5),
             (2970, -39.5, -50), (3010, -41, -42), (3140, -47.5, -37.5), (3260, -40.5, -48.5),
             (3420, -44, -43.5), (3680, -47.5, -46.5), (3880, -58.5, -39), (4413, -66, -45),
             (4490, -61, -43.5), (4700, -51.5, -44.5), (5090, -64, -44.5), (5392, -56.5, -46),
             (5520, -60, -50.5), (5850, -51.5, -40), (6150, -66.5, -44.5), (6570, -66, -49),
             (6680, -48.5, -44.5), (7410, -62.5, -51.5), (7600, -66, -48), (9250, -70, -51),
             (10520, -69.5, -49)]
    # Wavering tooth tone. Each row: start in seconds, length in seconds, relative level in dB.
    tooth = [(7.65, 0.64, -33), (8.38, 0.15, -34.5), (8.58, .06, -29), (8.72, 0.3, -39)]
    # One mode of the disc catches and squeals. Each row: start in seconds, length in seconds,
    # frequency in Hz at the reference speed, relative level in dB.
    catches = [(7.85, .35, 3690, -43), (7.99, 0.068, 6760, -38), (7.99, .15, 4776, -41),
               (8.03, .07, 3087, -34), (8.14, 0.13, 3014, -39), (8.22, .14, 5938, -40),
               (8.25, .1, 1527, -46.5), (8.41, .06, 6460, -40), (8.57, 0.059, 4740, -39.5),
               (9.03, 0.0607, 5700, -44.5)]
    reference_hz = 2404  # reference speed, as the whine pitch
    stiffens = .13  # share of a change of speed that the modes follow
    tooth_level = strokes(tooth, attack_s=0.14, release_db_per_s=153.0)
    # the ratio to the whine drifts with the speed
    tooth_hz = whine_hz * np.interp(whine_hz, [2080, 2370, 2420], [1.395, 1.387, 1.36])
    tooth_tone = amp(1.2 * wobble(14) + 1.3 * wobble(120)) * tone(tooth_hz * (1 + .0013 * wobble(80)))
    stiffening = 1 + stiffens * (whine_hz / reference_hz - 1)
    spinning = np.minimum(whine_hz / reference_hz, 1) ** 22  # the disc sings freely only near full speed
    biting = bite(cutting)
    disc = 0
    for hz, free_db, wood_db in blade:
        level = amp(free_db) * spinning + amp(wood_db) * biting
        uneven = .7 + .8 * wobble(70)  # a steady ring under an uneven drive
        disc = disc + level * uneven * tone(hz * stiffening)
    waver = stiffening * (1 + .001 * wobble(70))
    squeals = sum(strokes([(s, length, db)], attack_s=0.03, release_db_per_s=152) * tone(hz * waver)
                  for s, length, hz, db in catches)
    rung = amp(2.4 * wobble(110)) * (amp(-1.0) * disc + amp(3.4) * squeals)
    return barn(tooth_level * tooth_tone + rung, wet_db=-9)


def scene():
    """Superposition: handling, then the saw, over the faint air of the barn."""
    whine_hz = speed() * (1 + .003 * wobble(60))
    cutting = depth()
    saw = sum(part(whine_hz, cutting) for part in (motor, drivetrain, windage, cut))
    # the first things are put down on the left
    pan_db = np.interp(np.arange(N) / SR, [2.3, 2.9], [1.6, .1])
    handling = (knocks() + sliding() + scuffs() + judder() + sleeve()) * amp([pan_db, -pan_db])
    return saw * amp([[-.2], [.2]]) + handling + tape() + quiet()


def record(dry):
    """Band limiting: nothing above 15.4 kHz remains."""
    return filtered(dry, lambda hz: hz < 15400)


dry = scene()
out = record(dry)
output_pcm(out)
```